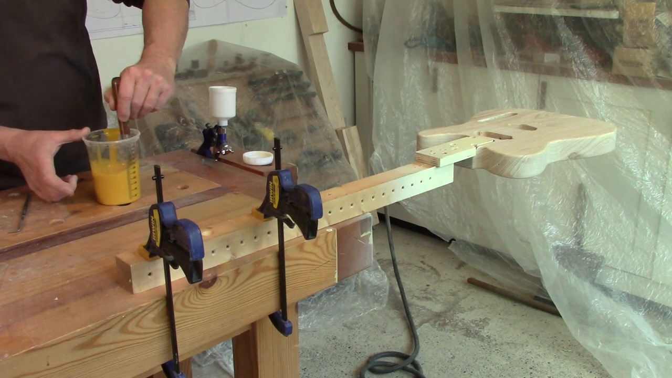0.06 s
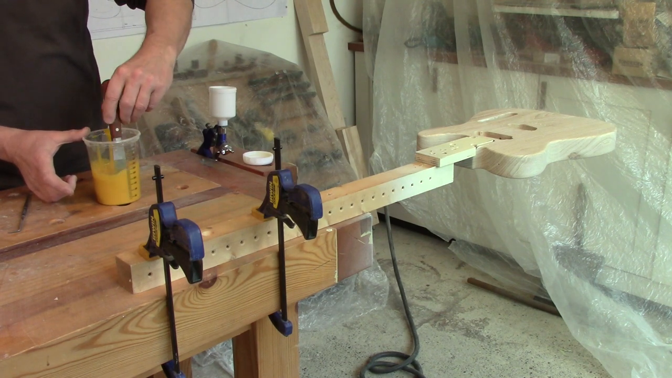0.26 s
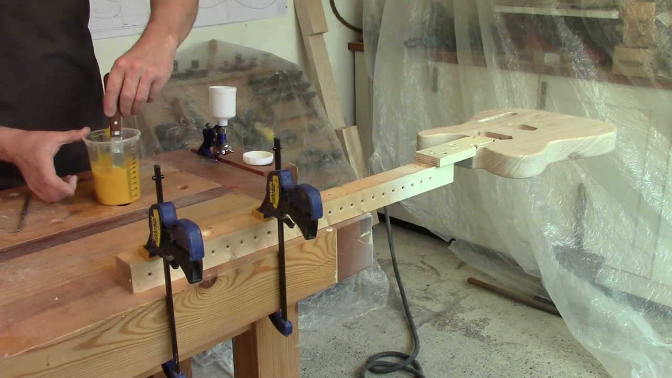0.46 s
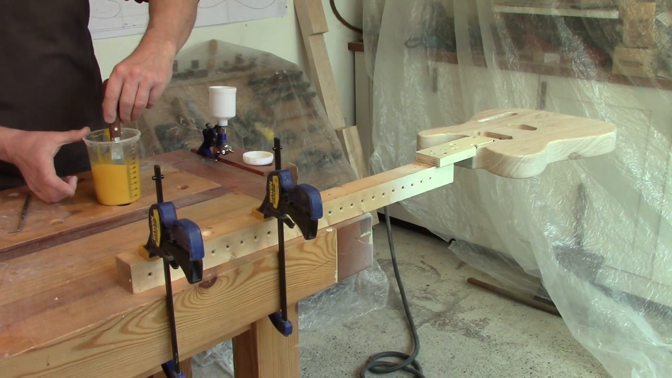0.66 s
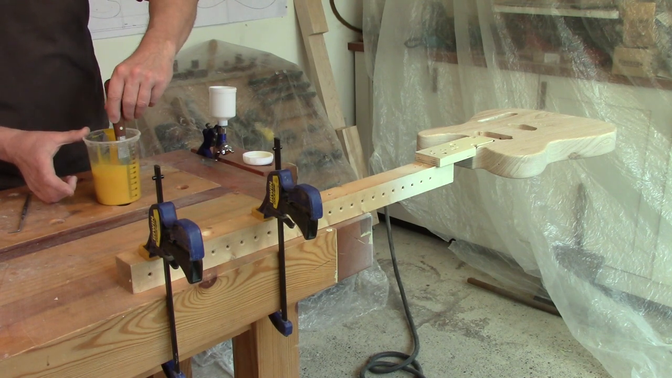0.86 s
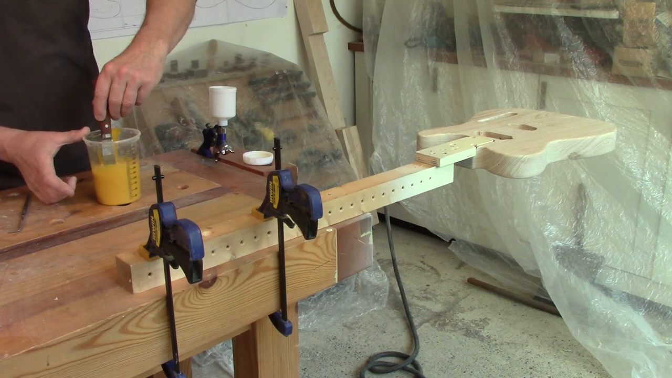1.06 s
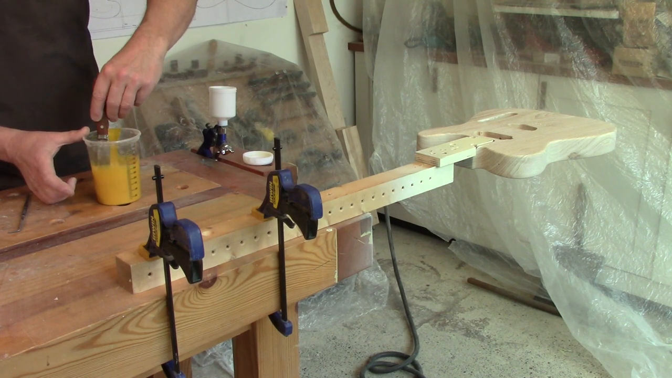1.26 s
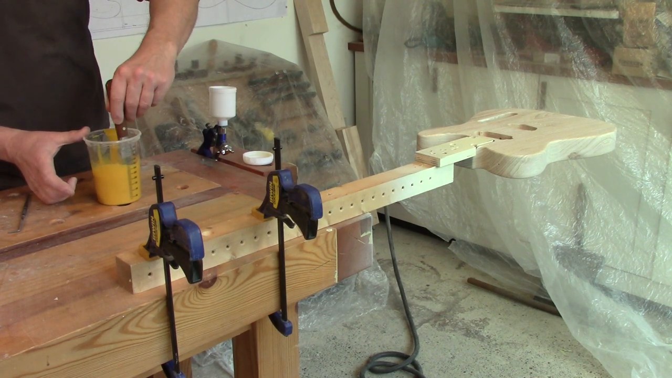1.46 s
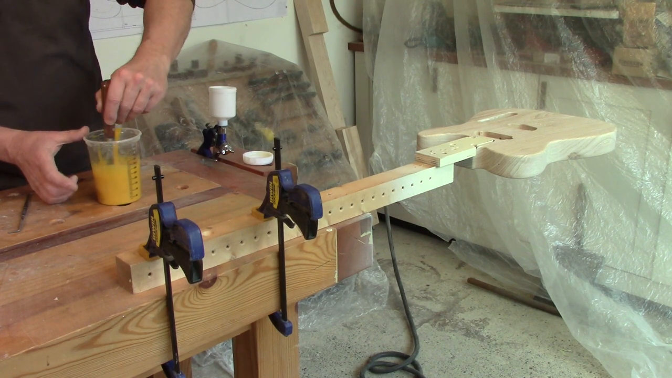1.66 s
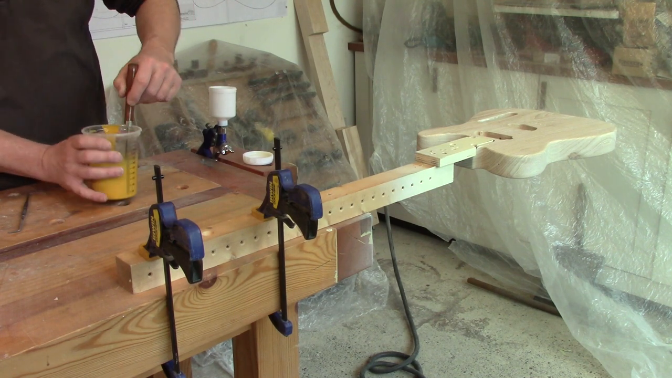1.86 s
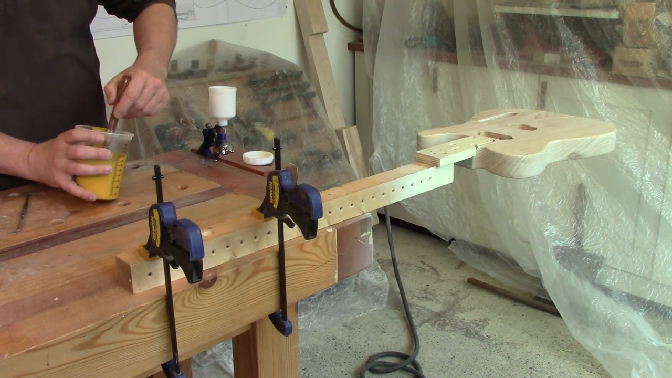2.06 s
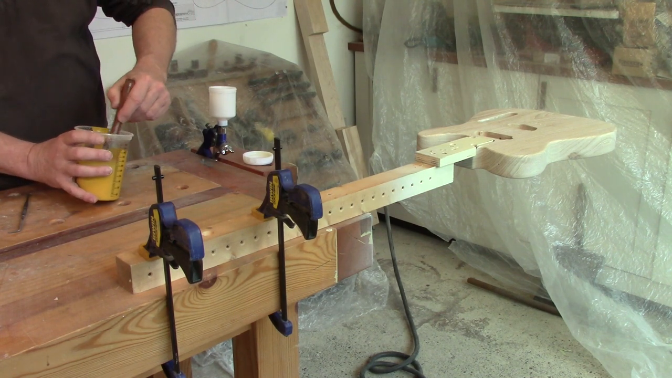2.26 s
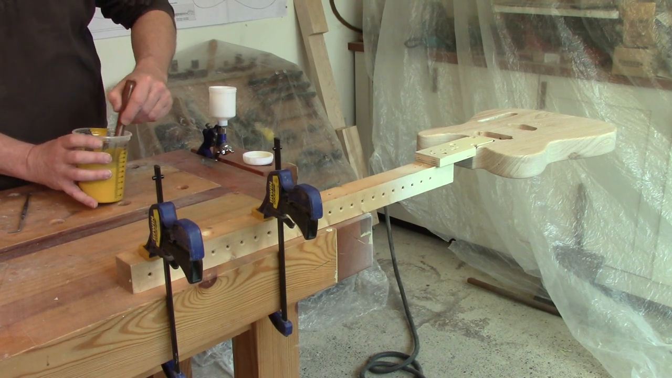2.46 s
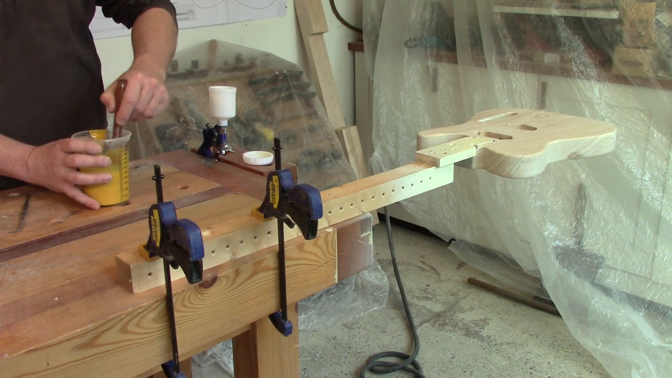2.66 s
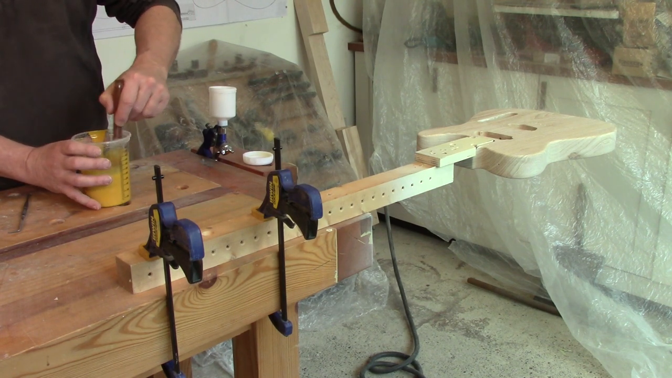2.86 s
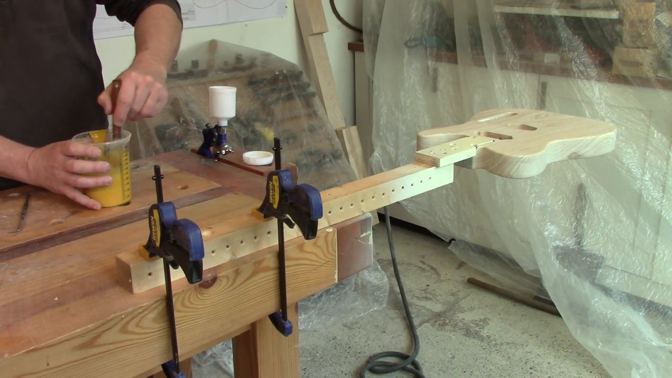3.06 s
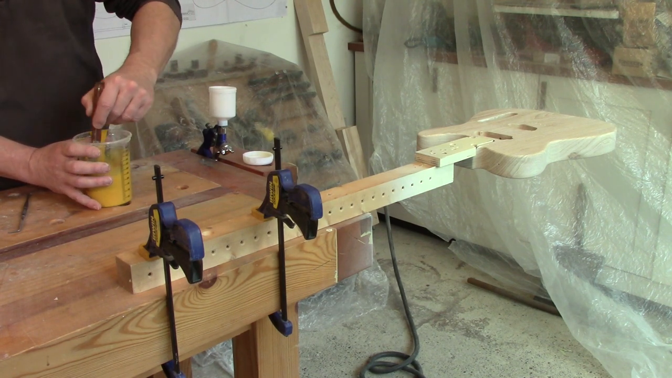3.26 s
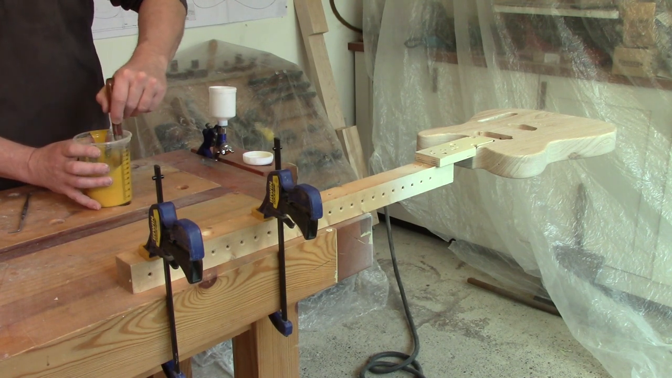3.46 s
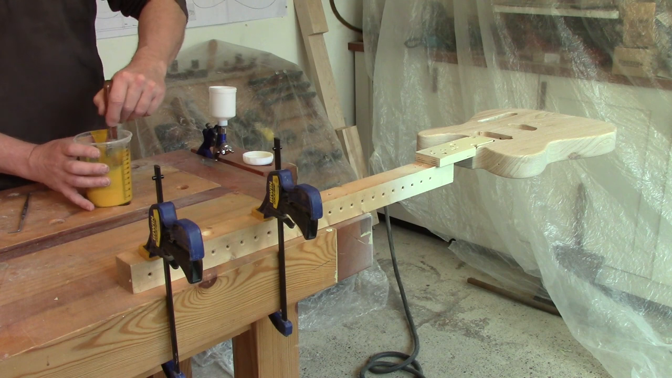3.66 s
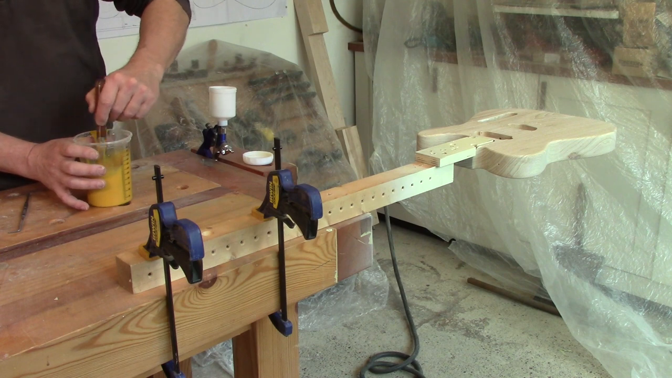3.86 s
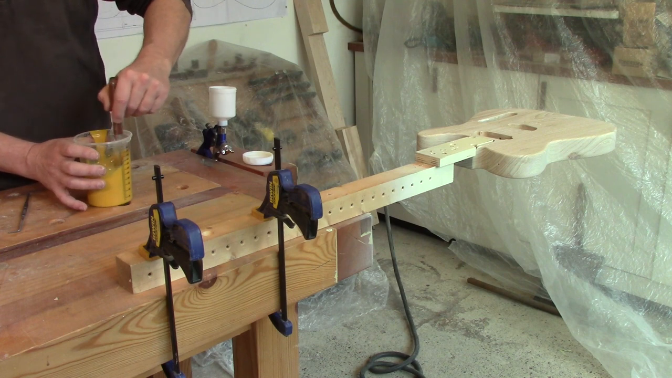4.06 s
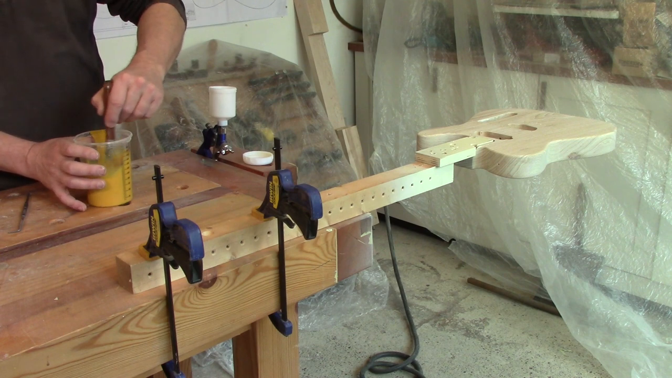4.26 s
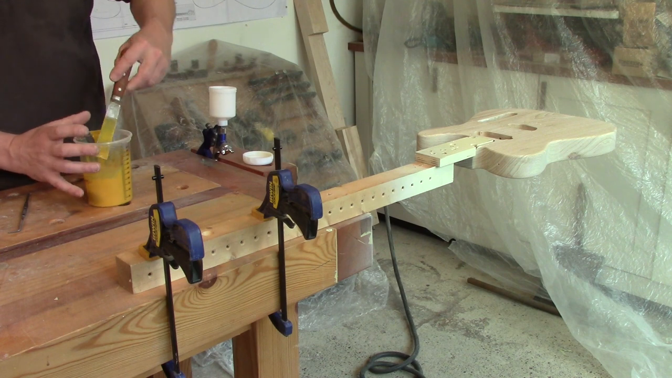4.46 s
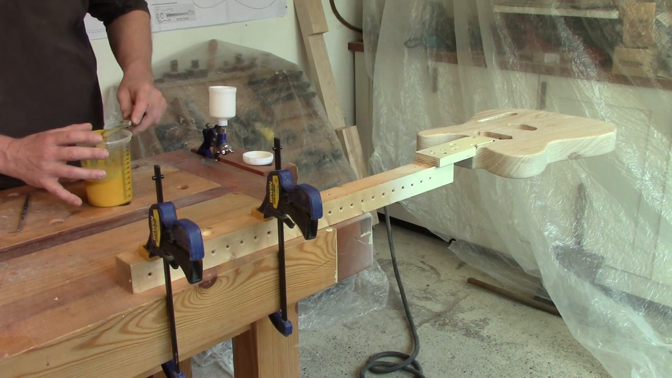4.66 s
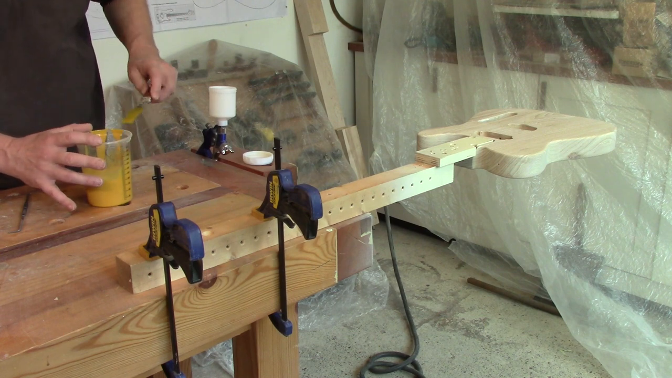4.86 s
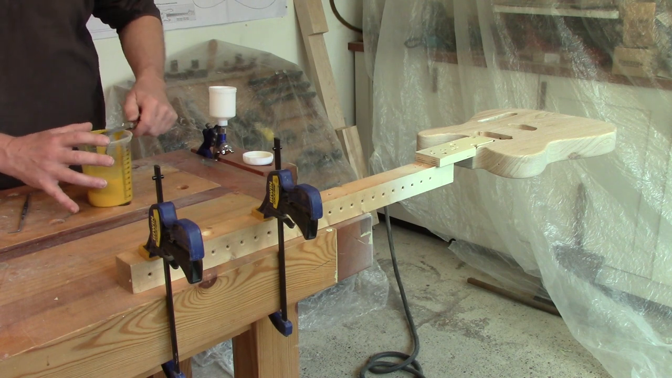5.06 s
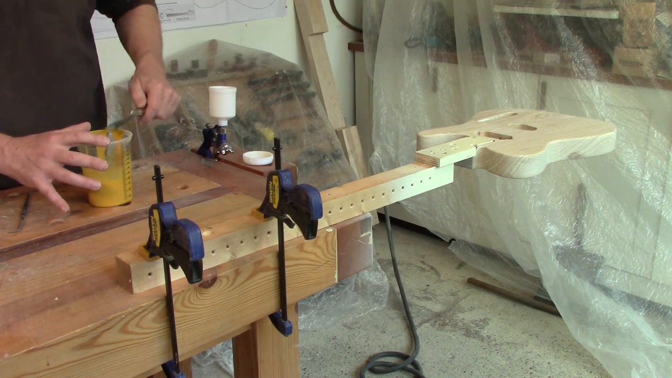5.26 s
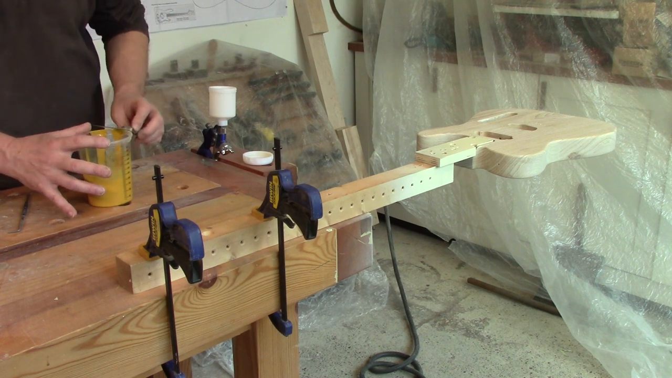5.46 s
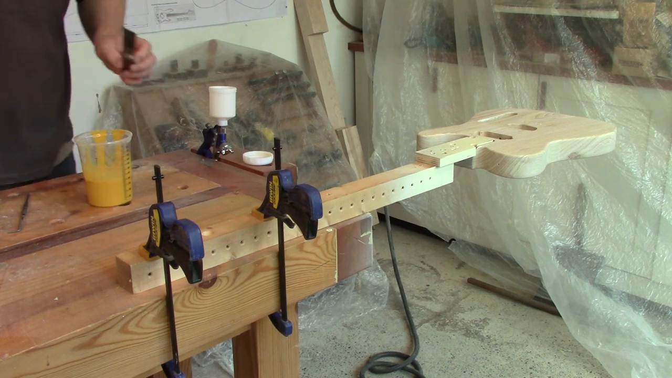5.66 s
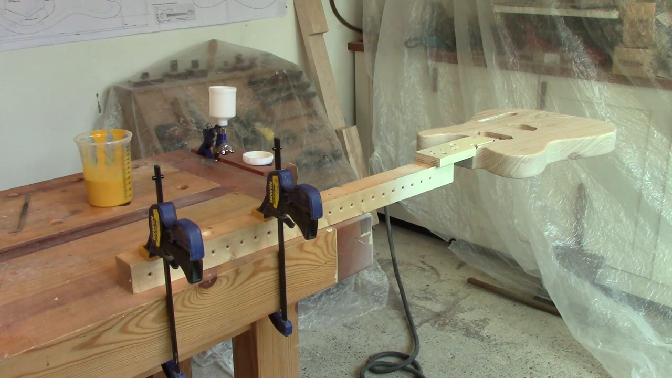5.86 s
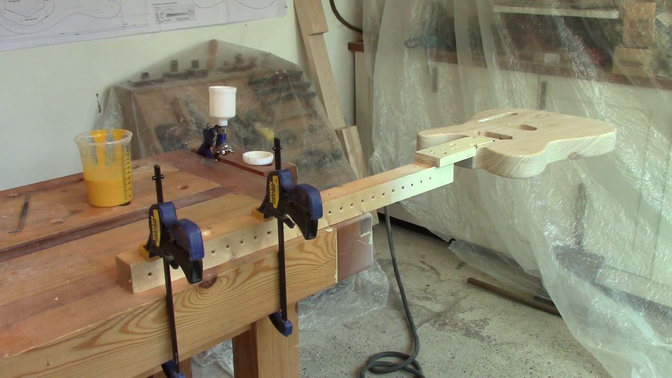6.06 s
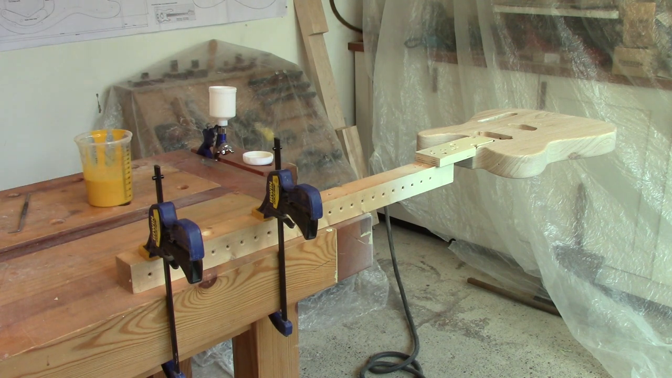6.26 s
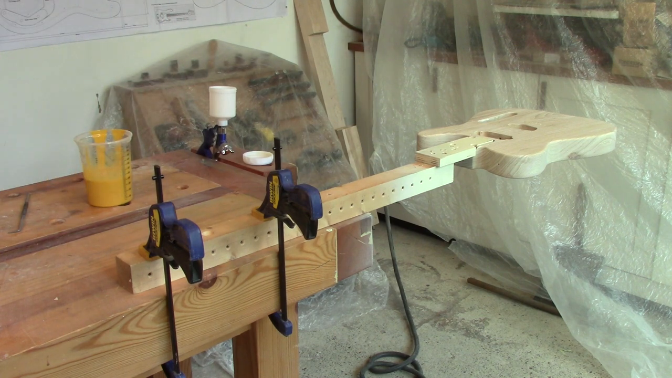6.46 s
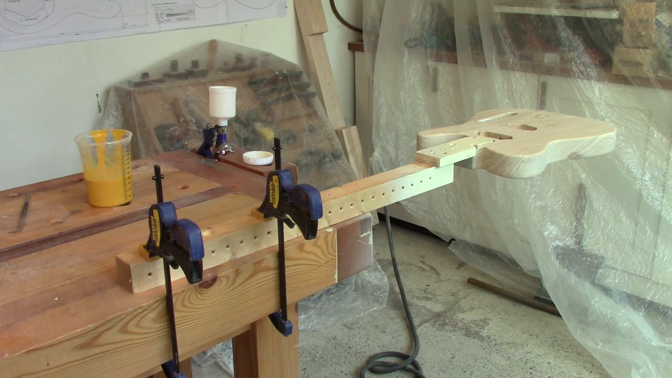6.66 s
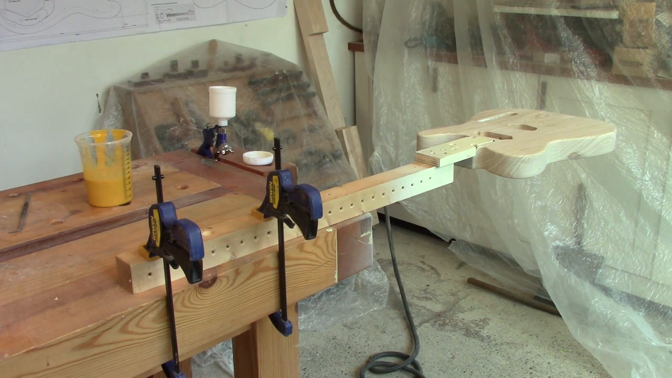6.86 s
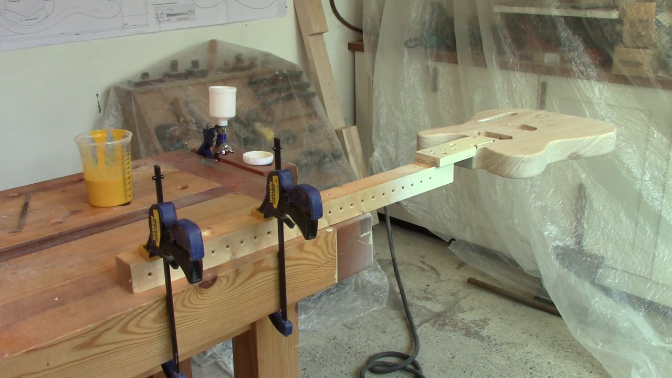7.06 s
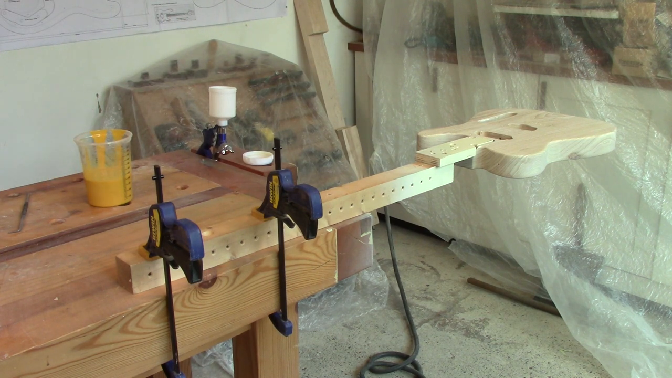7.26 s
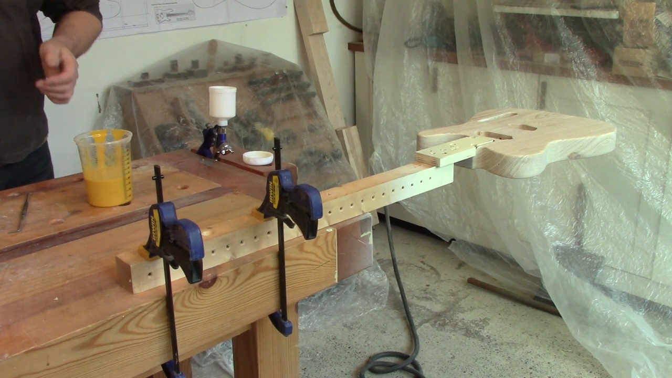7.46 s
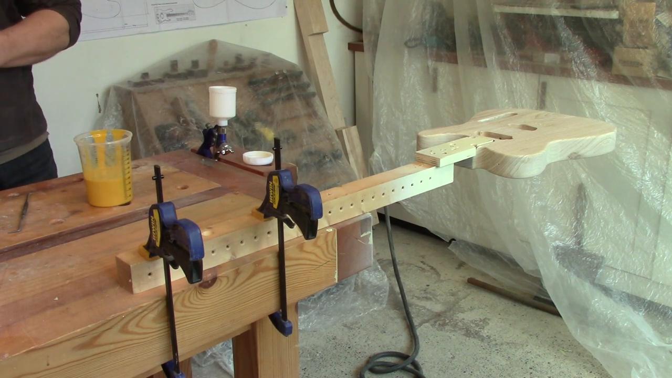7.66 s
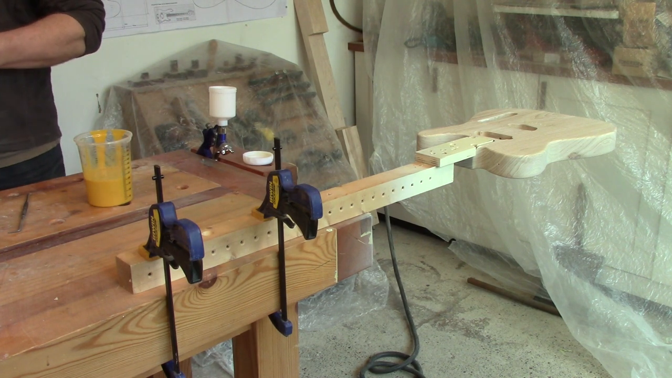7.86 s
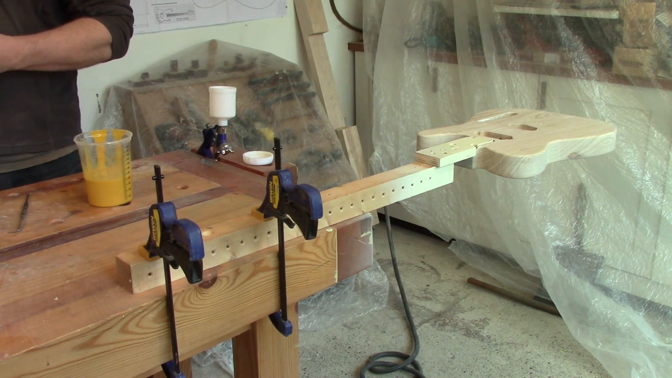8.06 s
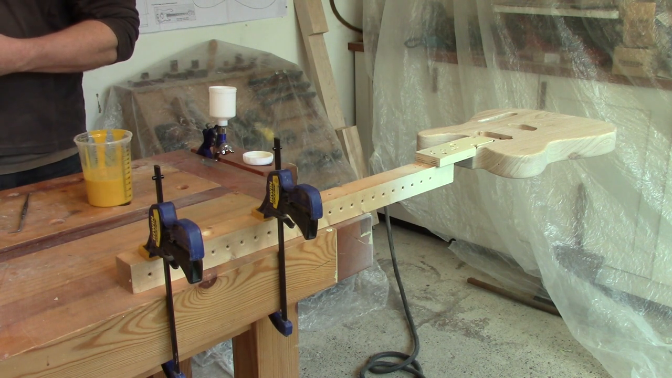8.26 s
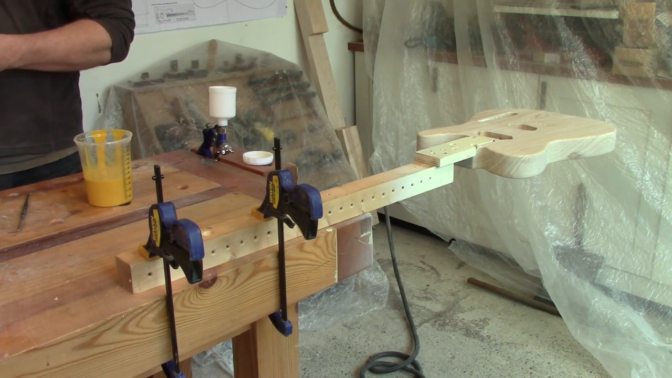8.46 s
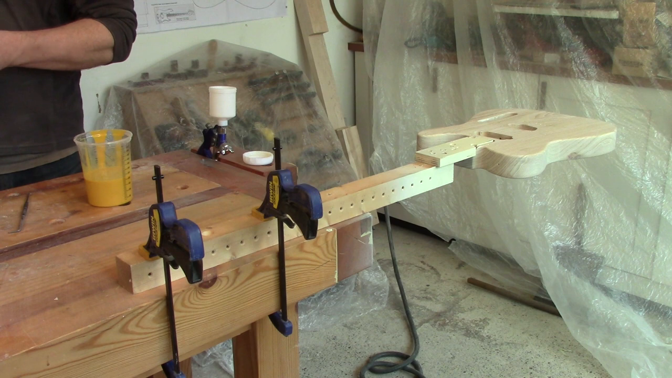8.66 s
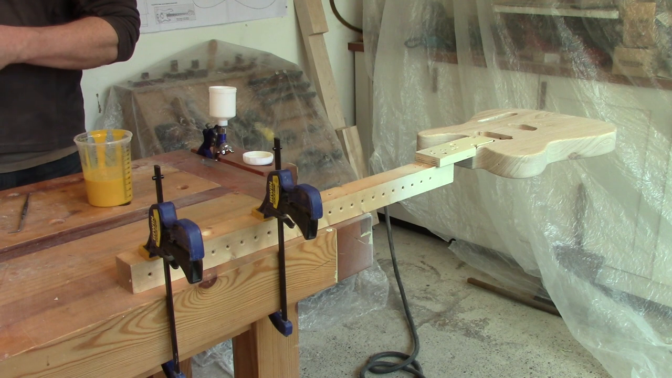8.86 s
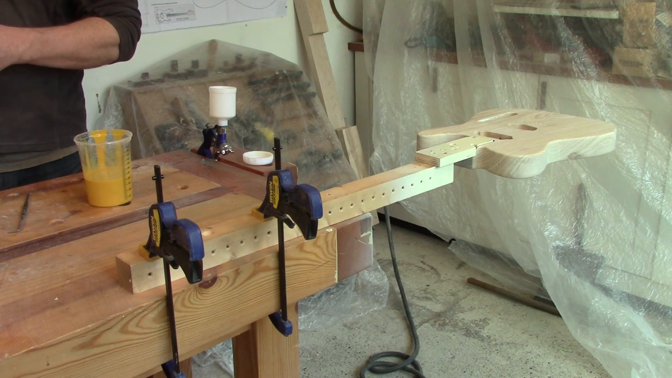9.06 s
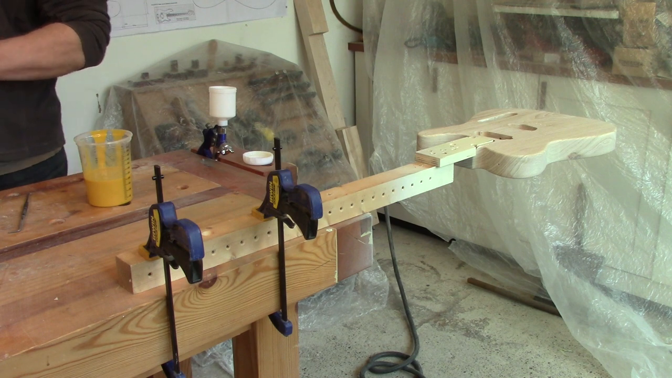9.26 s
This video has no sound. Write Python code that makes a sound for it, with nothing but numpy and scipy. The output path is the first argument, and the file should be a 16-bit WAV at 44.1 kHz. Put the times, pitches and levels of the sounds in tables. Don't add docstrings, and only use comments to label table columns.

```python
import sys
import numpy as np
from scipy import signal
from scipy.fft import rfft, irfft, next_fast_len
from scipy.io import wavfile
from scipy.ndimage import uniform_filter1d, map_coordinates

SR = 44100
rng = np.random.default_rng(int(sys.argv[2]) if len(sys.argv) > 2 else 0)


def gain_from_decibels(decibels):
    exponent = np.asarray(decibels, float) / 20
    return 10 ** exponent


def master(y):
    cut = np.clip(np.atleast_2d(y).T, -1, 1)
    pcm = np.round(cut * 32767)
    wavfile.write(sys.argv[1], SR, pcm.astype(np.int16))


N = 410571

# [t/s, ring level/dB, crack over ring/dB, struck spot f/Hz, stick over cup/dB]
STIR_KNOCKS = [(.039, -36, 7.5, 2570, -5), (.092, -31, -10, 2520, -5), (.102, -22.5, -16, 2300, -1),
               (.133, -13.5, -18, 1730, -1), (.244, -29.5, -1, 2500, -2), (.28, -20.5, -7.5, 2340, -5.5),
               (.329, -30, -1, 2360, 0), (.385, -38, 1.5, 2700, 4), (.402, -40, -5, 900, 1),
               (.429, -36, 1, 4090, 5), (.458, -28, -6, 2750, 13), (.521, -30.5, -2, 2860, 12),
               (.558, -27.5, -22, 1090, 1), (.687, -39, 4.5, 1140, 7), (.716, -29, -24, 2370, -4),
               (.733, -28, -1.5, 2510, 14), (.776, -22.5, -12, 2300, 10), (.861, -34.5, -3, 2940, 5),
               (.886, -29, -15, 2360, 5), (.937, -29.5, -7.5, 1310, 6), (1.038, -32.5, -6.5, 2670, 4),
               (1.066, -34.5, -7, 2470, -2), (1.118, -19.5, -15, 1730, -1.5), (1.156, -28.5, -13, 1900, 7),
               (1.173, -21.5, -35, 3030, 19), (1.226, -31, -2.5, 2450, 4), (1.259, -23.5, -12, 3050, -0.5),
               (1.308, -22.5, -9.5, 990, 8), (1.355, -20.5, -20, 2410, 1), (1.414, -30, -6, 1500, 11),
               (1.504, -18.5, -6.5, 2480, -1.5), (1.627, -41, 0, 4090, 4), (1.647, -16.5, -5.5, 1710, 2.5),
               (1.699, -25.5, -9, 1310, -4)]
BEATS = [
    (2.081, -19, -9, 3030, 4.5),
    (2.171, -21.5, -2.5, 1340, 2.5),
    (2.262, -18.5, -11.5, 1340, 4),
    (2.348, -18.5, 0, 2510, -1.5),
    (2.442, -20.5, 0, 1220, -4.5),
    (2.539, -17, 1.5, 1360, -2.5),
    (2.636, -13.5, -2.5, 1310, 1),
    (2.737, -13, -7, 1290, 0.5),
    (2.837, -13.5, -7.5, 1920, 2.5),
    (2.935, -14, -3.5, 2420, -6),
]
ROUNDS = [(1.95, -29, -1, 2900, 1), (1.968, -24.5, -5, 1270, 6), (1.994, -38, 16.5, 2300, 14),
          (2.725, -38, -20, 2600, 17), (2.794, -29, -11, 705, 5.5), (2.89, -30.5, -6, 2510, -1),
          (2.941, -13.5, -10, 4800, -5), (3.045, -31.5, 10.5, 1260, -5), (3.086, -34, 8.5, 3030, -7),
          (3.147, -24.5, 4, 1400, -2), (3.181, -22, -31, 990, 3), (3.259, -20, -6, 1300, -0.5),
          (3.295, -12.5, -17, 1000, 5), (3.375, -26.5, -6, 1310, 4), (3.436, -20.5, -37, 1500, -4),
          (3.461, -24, -20, 705, 7), (3.498, -18.5, -36, 2260, -2.5), (3.506, -17.5, -25, 2430, 5),
          (3.549, -13, -23, 1440, 4), (3.553, -25, -17, 4400, 11), (3.611, -16, -10.5, 3100, 4.5),
          (3.621, -28, -15, 2830, 0), (3.383, -21.5, -11, 3030, 4), (3.729, -17.5, -5, 2440, 0),
          (3.823, -30.5, 1, 942, -4), (3.846, -27.5, -15, 2420, 3), (3.868, -22, -20, 2500, 4.5),
          (3.901, -17.5, -40, 1590, -12), (3.939, -23, -3, 1030, 0), (3.968, -20.5, -7, 2510, 14),
          (3.982, -21, -14, 2510, 14), (4.003, -23.5, 1.5, 2510, 3.5), (4.047, -22.5, -5, 2300, -2.5),
          (4.087, -17.5, -7, 3030, 5),
          (4.163, -23, -11, 3030, 0), (4.167, -22, -9, 930, -1), (4.208, -29, -12, 3030, 2),
              (4.212, -23.5, -8, 3030, -4.5), (4.225, -28, -18, 2500, 8), (4.233, -33, -20, 2500, 8),
              (4.253, -36, -20, 2550, 10), (4.263, -13, -20, 1770, -8), (4.273, -20, -25, 1500, -16),
              (4.282, -22, -25, 1090, -7), (4.337, -15.5, -17.5, 1810, -3.5), (4.341, -19.5, -25, 1730, 3)]
RIM_KNOCKS = [(4.597, -18.5, -13, 2350, -4), (4.629, -26, -16, 705, 8.5), (4.739, -28, -23, 2300, 9),
              (4.765, -30, -20, 705, -6), (4.778, -26, -20, 1090, -3), (5.07, -13, -9.5, 2300, 6),
              (5.076, -19.5, -12, 2370, -4), (5.172, -29, 7, 2370, 13), (5.316, -12.5, 3, 2320, 0),
              (5.319, -21, 1, 970, 2), (5.497, -14, -4.5, 2300, -2)]
# [t/s, ring level/dB, crack over ring/dB, spot f/Hz, high over low/dB]
HANDLING = [(5.779, -30.5, -19, 2040, -8), (5.958, -31.5, -5, 1060, 5.5), (6.594, -38, 1, 1170, 6),
            (6.879, -38, 0, 2580, 0), (7.346, -37, -15, 2750, 0), (7.538, -36.5, 6, 3640, -3),
            (7.74, -39, 5, 1320, 6), (7.923, -29, -1.5, 1430, -3), (8.096, -44.5, 12.5, 3900, -6),
            (8.326, -36, 1, 1750, -3), (8.498, -43, 8.5, 2620, 1), (8.649, -41, 2, 1700, 2),
            (8.698, -46, 14, 3790, -5), (9.004, -34, 0, 2700, 5), (9.065, -58, 26, 4400, 0),
            (9.108, -37.5, 6, 1250, 4)]
# [t/s, peak level/dB, f/Hz, chatter t60/s]
CLINKS = [(.134, -15, 993, 0.032), (.43, -44, 4090, .07), (.459, -29, 3230, 0.054), (1.627, -40, 4090, .07),
          (3.55, -28.5, 4400, 0.043), (5.779, -40, 3400, .07), (7.538, -39, 5100, 0.19),
          (7.925, -31, 4860, 0.066), (8.097, -30, 5000, 0.041), (9.005, -35, 2550, 0.034),
          (9.109, -38.5, 4400, 0.056), (9.147, -43, 2400, 0.045), (9.212, -29, 3970, 0.21),
          (9.219, -31.5, 2330, 0.06), (9.245, -32, 6300, .1), (7.42, -43, 1200, .2)]
# [t/s, peak level/dB]
FLICKS = [
    (4.8745, -28),
    (5.2224, -28),
    (5.3473, -17),
    (5.5835, -8.5),
]
# [t/s, peak level/dB]
THUDS = [
    (7.087, -34.5),
    (7.343, -31),
    (7.389, -34),
    (7.55, -34),
    (8.097, -34.5),
    (9.257, -33.5),
]
# [t/s, peak level/dB, brightest f/Hz]
SKIDS = [(0.315, -31, 7600), (0.078, -34, 12500), (0.5695, -36, 8800), (0.585, -32, 11900),
         (0.622, -38, 8000), (0.901, -37, 12000), (0.945, -36, 13000), (1.3324, -29, 12900),
         (1.4037, -40, 10600), (1.4845, -44, 10600), (3.5425, -22.5, 6580), (0.76, -34, 8800),
         (1.0894, -30.5, 13900), (1.128, -36, 6970), (1.155, -35, 6570), (1.255, -28, 5430),
         (1.72, -33, 11500), (1.346, -20.5, 9300), (1.442, -28.5, 8950), (1.594, -36, 9000),
         (3.1958, -23, 6900), (3.3184, -21, 6440), (3.3972, -19, 7540), (3.4585, -31, 11700),
         (3.521, -31, 12200), (3.6427, -21, 6600), (3.762, -21.5, 7600), (3.883, -21, 6740),
         (3.983, -21.5, 8750), (4.018, -23, 11100), (4.119, -22, 6840), (4.2495, -23, 6060)]
# [t/s, peak level/dB, brightest f/Hz]
BACKSWINGS = [(2.148, -44, 7000), (2.2174, -28.5, 7260), (2.3006, -29.5, 12200), (2.3291, -36, 8660),
              (2.4216, -31, 8630), (2.476, -32, 10500), (2.58, -32, 8000), (2.6908, -30, 7910),
              (2.7871, -29, 8320), (2.8888, -28, 6900), (2.988, -25.5, 6640)]
# [t/s, peak level/dB, brightest f/Hz]
SCUFFS = [(7.36, -35, 12000), (7.379, -32, 13500), (7.885, -26.5, 8600), (8.2211, -37, 8100),
          (8.3846, -34, 4650), (8.562, -36, 10500), (8.894, -35, 6800), (8.9564, -45, 6000),
          (9.1846, -33, 5670)]

# [t/s, level/dB]
STIR = [(0, -55), (.21, -67), (.33, -77), (.66, -71), (.8, -73), (1.02, -71), (1.3, -68), (1.55, -55.5),
        (1.78, -69), (2.07, -63.5), (2.8, -54), (3.2, -55), (3.45, -50), (3.72, -53), (4.0, -52),
        (4.3, -50), (4.42, -77)]
# [full at t/s, rise/s, hold/s, pressure level/dB]
WIPE = [(4.628, .03, 0.02, -48.5), (4.745, .008, 0.052, -47), (4.791, 0.12, 0.029, -34.5),
        (4.836, 0.071, 0.044, -40.5), (5.11, 0.02, 0.063, -43.5), (5.171, 0.022, 0.054, -38),
        (5.229, .04, 0.00081, -42.5), (5.345, 0.03, 0.0061, -32), (5.517, 0.021, 0.017, -38.5),
        (5.587, 0.16, 0.00015, -32)]
# [t/s, effort level/dB]
RAG = [(5.77, -67), (5.84, -51.5), (6.1, -49), (6.3, -57), (6.55, -57.5), (6.86, -54), (6.94, -63.5),
       (7.33, -63.5), (7.5, -69), (7.56, -50.5), (8.06, -54), (8.2, -58.5), (8.65, -59), (8.72, -53),
       (8.86, -56), (8.98, -58), (9.15, -51), (9.31, -47)]
# [t/s, half length/s, body level/dB, hiss level/dB]
STROKES = [(1.834, 0.011, -54, -41.5), (5.861, 0.019, -43.5, -46), (5.975, 0.0079, -48, -48),
           (6.011, 0.023, -44.5, -50), (6.232, 0.025, -47.5, -43.5), (6.347, 0.015, -59, -37),
           (6.437, 0.016, -60, -40.5), (6.62, 0.013, -58, -47), (6.699, 0.018, -48.5, -39),
           (6.794, 0.011, -72, -49), (7.406, 0.018, -55, -39), (7.559, 0.016, -48, -69),
           (7.704, 0.018, -73, -45.5), (7.908, 0.011, -46, -58), (8.108, 0.013, -48, -52),
           (8.338, 0.0082, -47, -54), (8.733, 0.066, -68, -59), (9.236, 0.022, -43, -31.5)]
# [t/s, level/dB]
HUM_SWELL = [(0.0, -80), (1.09, -87), (1.19, -71), (2.41, -90), (2.95, -68), (3.08, -92), (4.25, -79.5),
             (5.37, -77), (6.43, -84), (7.08, -73.5), (7.16, -94), (9.31, -78)]

# [f/Hz, level/dB, t60/s]
CUP = [(510, -2, 0.12), (705, -1.5, 0.19), (912, 8.5, 0.023), (1090, 7.5, 0.0062), (1310, 13, 0.0098),
       (1500, -13, 0.0054), (1690, -12, 0.036), (1730, 7, 0.016)]
# [f/Hz, level/dB, t60/s]
STICK = [(1890, 5.5, 0.022), (2170, -4, 0.0025), (2370, 9.5, 0.013), (2510, 5, 0.042), (2723, 9.5, 0.007),
         (3030, 12, 0.0074), (3400, 9.5, 0.047), (3640, -1, 0.0055), (4090, -7, 0.1), (4400, -42, 0.016),
         (4800, -17, 0.017), (5320, -7, 0.052)]
# [f/Hz, width/Hz, level/dB]
EDGE = [(2370, 180, 5.5), (3300, 1300, -8), (4400, 330, -4), (1090, 1700, -11)]
# [f/Hz, width/Hz, level/dB]
BENCH = [(480, 110, 5.5), (770, 190, 5), (1280, 600, 2.5)]
# [f/Hz, width/Hz, level/dB]
STANDING = [(705, 45, -1), (1090, 40, -2), (1292, 50, -4), (1462, 40, -6), (1595, 40, -4), (1760, 40, -7),
            (2230, 50, -7.5), (2365, 50, -3), (2510, 50, -3), (3014, 90, -8)]

# [f/Hz, level/dB per Hz]
CRACK = [(2350, -33), (4000, 0.5), (4810, -6), (7680, 2), (11200, -3), (12700, -2), (16000, -10),
         (16500, -48)]
# [f/Hz, level/dB per Hz]
WET = [(2350, -52), (4000, -9), (5070, -4), (9170, 0.5), (13600, -1.5), (15900, -7), (16500, -98)]
# [f/Hz, level/dB per Hz]
RIM_HISS = [(2650, -7.5), (4500, -11), (4940, -8), (6340, -12), (7620, -3.5), (9020, -11.5), (11300, -16.5),
            (15000, -12), (16200, -22), (16500, -53)]
# [f/Hz, level/dB per Hz]
RAG_BODY = [(250, -44), (700, 6), (1800, 2.5), (3300, 2), (4900, 3.5), (7500, -6.5), (14000, -39)]
# [f/Hz, level/dB per Hz]
RAG_HISS = [(2060, -56), (3500, -8), (4660, -2), (9630, 4), (15100, -1.5), (16200, -7), (16500, -40)]
# [f/Hz, level/dB per Hz]
AIR = [(25, -14), (86, -13.5), (184, -3.5), (237, -4), (313, -2), (448, 1), (538, 4), (809, 2.5),
       (1250, 6.5), (1400, 1.5), (2040, 0), (3910, -3.5), (13600, -12.5), (15500, -8), (16500, -63)]
# [f/Hz, likeness]
ALIKE = [(70, 0.1), (130, 0.77), (600, 0.73), (15000, 0.73)]
# [f/Hz, t60/s]
SHOP = [(300, 0.31), (1000, 0.15), (3000, 0.16), (12000, 0.038)]
# [f/Hz, side minus mid level/dB]
WIDTH = [(300, -41), (700, -51), (1300, -56), (2400, -27), (4400, -26.5), (15000, -17)]

SHELL_HZ, SHELL_WIDE_HZ = 3050, 730
DIP_HZ, DIP_WIDE_HZ = 3400, 577
RISE_DB, RELEASE_DB_PER_S = 51, 483
CLINK_CYCLES = 23
SQUEAK_S, SQUEAK_LENGTH_S, SQUEAK_DB = 8.4, 0.091, -54
SQUEAK_HZ, SQUEAK_SAG_HZ_PER_S = 4770, 6500
AIR_DB, HUM_HZ = -56, 195
MIC_HZ = 411
EDGE_HZ = 15950


def unit(x):
    return x / np.sqrt(np.mean(x ** 2) + 1e-20)


def peak(x):
    return x / np.abs(x).max(axis=-1, keepdims=True)


def decay(t, t60):
    return gain_from_decibels(-60 * t / t60)


def noise(count, t):
    return rng.standard_normal((count, len(t)))


def wobble(rate):
    return map_coordinates(rng.standard_normal(int(N * rate / SR) + 4), [np.arange(N) * rate / SR])


def along(points, hz):
    f, v = np.transpose(points)
    return np.interp(np.log(hz + 1), np.log(f + 1), v)


def colour(spectrum):
    return lambda hz: gain_from_decibels(along(spectrum, hz))


def filtered(x, response):
    m = next_fast_len(x.shape[-1] + 2048, real=True)
    return irfft(rfft(x, m) * response(np.fft.rfftfreq(m, 1 / SR)), m)[..., :x.shape[-1]]


def resonances(peaks):
    def response(f):
        total = 0
        for k, (c, w, db) in enumerate(peaks):
            total = total + (-1) ** k * gain_from_decibels(db) * 1j * f * w / (c * c - f * f + 1j * f * w)
        return total
    return response


def knocks(events, wet_db, lean_db, even_hz, skid, rattle, grip_db):
    s, db, crack, spot_hz, bias_db = np.transpose(events)[:, :, None]
    held = [(hz, level - grip_db * (hz < 900), t60) for hz, level, t60 in CUP]
    stick_db = lean_db * np.clip(np.log2(spot_hz / even_hz), -1, 1) + bias_db
    t = np.arange(SR // 14) / SR
    bright_hz = rng.uniform(7000, 19500, (len(s), 1))

    def tint(hz):
        return colour(CRACK)(hz) * (1 + 0.5 * np.exp(-((hz - bright_hz) / 1800) ** 2))

    snap = filtered(noise(len(s), t), tint) * (decay(t, 0.0084) + 0.56 * decay(t, skid))
    cup = ring(held, spot_hz, t, detune=0.0032, chatter=0.039, rattle=rattle)
    stick = ring(STICK, spot_hz, t, detune=0.019, chatter=0.012, rattle=0.71 * rattle)
    hits = gain_from_decibels(np.minimum(-stick_db, 0)) * cup + gain_from_decibels(np.minimum(stick_db, 0)) * stick
    hits = filtered(hits, shell) + gain_from_decibels(crack) * peak(snap)
    return place(s[:, 0], gain_from_decibels(db - 4.0) * hits, wet_db)


def ring(modes, favoured_hz, t, detune, chatter, rattle):
    hz, db, t60 = np.transpose(modes)[:, :, None]
    luck = rng.standard_normal((2, len(favoured_hz), len(hz), 1))
    octave_like = np.log(hz / favoured_hz[:, None]) / .16
    spot_db = 10 * np.exp(-octave_like ** 2) + 1.5 * luck[0]
    clack = 4.2 * decay(t, 0.0064)
    tones = gain_from_decibels(db) * np.sin(2 * np.pi * hz * (1 + detune * luck[1]) * t)
    tones *= 1 - np.exp(-t / 0.00024)
    blow = (gain_from_decibels(spot_db) * (decay(t, t60) + clack) * tones).sum(axis=1)
    touch = (gain_from_decibels(0.58 * spot_db + 3.0) * (decay(t, 0.45 * t60) + clack) * tones).sum(axis=1)
    force = rattle * noise(len(favoured_hz), t) * decay(t, chatter)
    return peak(blow + signal.fftconvolve(touch, alike(force), axes=1)[:, :len(t)])


def shell(f):
    dip = DIP_HZ ** 2 - f * f + 1j * f * DIP_WIDE_HZ
    return dip / (SHELL_HZ ** 2 - f * f + 1j * f * SHELL_WIDE_HZ)


def stirring():
    drag, hiss = gains(STIR, grows=0.85, middle_db=-61.5)
    wall = resonances([(hz, 8 / t60, db) for hz, db, t60 in CUP + STICK])
    body = drag * friction(wall, 150, 25.0, 3.6, -1.5)
    wet = hiss * friction(colour(WET), 240, 3, 0.47, -1.9)
    return gain_from_decibels(2.0) * (body + wet)


def wiping():
    squeal = pressure()
    hiss = squeal ** 1.238
    scrape = gain_from_decibels(0.5) * squeal * friction(resonances(EDGE), 410, 16.0, 3.2, -1.6)
    return scrape + gain_from_decibels(10.0) * hiss * friction(colour(RIM_HISS), 250, 3.9, 2.3, -1.7)


def pressure():
    t = np.arange(N) / SR
    s, rise, hold, db = np.transpose(WIPE)[:, :, None]
    rising = RISE_DB * np.maximum(s - t, 0) / rise
    falling = RELEASE_DB_PER_S * np.maximum(t - s - hold, 0)
    return gain_from_decibels(np.max(db - rising - falling, axis=0))


def gains(effort, grows, middle_db):
    db = np.interp(np.arange(N) / SR, *np.transpose(effort), -150, -150)
    return gain_from_decibels([db, middle_db + grows * (db - middle_db)])


def friction(response, slips, spread_db, flutter_db, wide_db):
    slip = (rng.random(N) < slips / SR) * gain_from_decibels(np.minimum(spread_db * rng.exponential(size=N), 13))
    rub = rng.standard_normal((2, N)) * [1 + slip, np.ones(N)] * gain_from_decibels(min(flutter_db, 2) * wobble(40))

    def mid_side(hz):
        return response(hz) * [np.ones(len(hz)), gain_from_decibels(along(WIDTH, hz) + wide_db)]

    mid, side = filtered(rub, mid_side)
    return unit(np.array([mid + side, mid - side]))


def patchy(x, depth_db):
    z = signal.stft(x, nperseg=256)[2]
    field = uniform_filter1d(rng.standard_normal(z.shape[1:]), size=9, axis=0)
    field = uniform_filter1d(field, size=7, axis=1)
    return signal.istft(z * gain_from_decibels(depth_db * unit(field)), nperseg=256)[1][:, :N]


def flicks():
    s, db = np.transpose(FLICKS)[:, :, None]
    t = np.arange(SR // 100) / SR
    click = filtered(noise(len(s), t), resonances([(4900, 6200, 0)]))
    return place(s[:, 0], gain_from_decibels(db) * peak(click * decay(t, 0.0038)), -1.0)


def skids():
    s, db, bright_hz = np.transpose(SKIDS + SCUFFS + BACKSWINGS)[:, :, None]
    t = np.arange(SR // 14) / SR

    def tint(hz):
        return colour(WET)(hz) * (1 + 1.7 * np.exp(-((hz - bright_hz) / 1200) ** 2))

    hiss = filtered(noise(len(s), t), tint) * decay(t, 0.09) * np.cos(np.pi * t / t[-1] / 2)
    return place(s[:, 0], gain_from_decibels(db - 8.5) * peak(hiss), -0.54)


def clinks():
    s, db, hz, t60 = np.transpose(CLINKS)[:, :, None]
    t = np.arange(SR // 14) / SR
    chatter = noise(len(s), t) * decay(t, t60)
    mode = decay(t, CLINK_CYCLES / hz) * np.sin(2 * np.pi * hz * t)
    tone = signal.fftconvolve(mode, chatter, axes=1)[:, :len(t)]
    return place(s[:, 0], gain_from_decibels(db) * peak(tone), -2.5)


def rag():
    body, hiss = np.pad(gains(RAG, grows=1.32, middle_db=-48.5), ((0, 0), (0, SR)))
    t = np.arange(-SR // 5, SR // 5) / SR
    for s, half, body_db, hiss_db in STROKES:
        swell = np.exp(-np.where(t < 0, .6, .35) * (t / max(half, .005)) ** 2)
        start = round(s * SR) - SR // 5
        body[start:][:len(t)] += gain_from_decibels(body_db - 0.5) * swell
        hiss[start:][:len(t)] += gain_from_decibels(hiss_db - 4.5) * swell
    rub = body[:N] * friction(colour(RAG_BODY), 170, 8.3, 3.7, 2.8)
    return rub + hiss[:N] * friction(colour(RAG_HISS), 260, 6.4, 3.0, 1.9)


def squeak():
    t = np.arange(N) / SR - SQUEAK_S
    swell = np.sin(np.pi * np.clip(t / SQUEAK_LENGTH_S, 0, 1)) ** .6
    phase = 2 * np.pi * (SQUEAK_HZ * t - SQUEAK_SAG_HZ_PER_S * t * t / 2) + .8 * wobble(150)
    return gain_from_decibels(SQUEAK_DB + 3.0 * wobble(80)) * swell * np.sin(phase)


def thuds():
    s, db = np.transpose(THUDS)[:, :, None]
    t = np.arange(SR // 14) / SR
    puff = noise(len(s), t) * decay(t, 0.072)
    low = filtered(puff, lambda hz: resonances(BENCH)(hz) / (1 + 1j * hz / 1600) ** 2)
    return place(s[:, 0], gain_from_decibels(db) * peak(low), 0.5)


def standing(hz):
    return 1 + sum(resonances([one])(hz) for one in STANDING)


def place(times, sounds, wet_db):
    out = np.zeros((2, N + SR))
    heard = signal.fftconvolve(sounds[:, None], shop(len(times), wet_db), axes=2)
    for s, one in zip(times, heard):
        out[:, round(s * SR):][:, :one.shape[1]] += one
    return out[:, :N]


def shop(count, wet_db):
    hz, t, z = signal.stft(rng.standard_normal((count, 2, SR // 8)), SR, nperseg=256)
    z[:, 1] *= gain_from_decibels(along(WIDTH, hz) + 5.5)[:, None]
    tails = signal.istft(z * decay(t, along(SHOP, hz)[:, None]), SR, nperseg=256)[1]
    tails *= gain_from_decibels(wet_db) / np.linalg.norm(tails[:, :1], axis=2, keepdims=True)
    tails[..., :40] = 0
    tails[:, 0, 0] = 1
    tails = alike(tails)
    return np.stack([tails[:, 0] + tails[:, 1], tails[:, 0] - tails[:, 1]], axis=1)


def alike(x):
    z = rfft(x, 2 * x.shape[-1])
    bins = round(330 * 2 * x.shape[-1] / SR)
    broad = uniform_filter1d(np.abs(z) ** 2, size=bins, axis=-1)
    return irfft(z * np.sqrt(broad.mean(axis=0) / broad))[..., :x.shape[-1]]


def air():
    def mid_side(hz):
        turn = np.arccos(np.clip(along(ALIKE, hz), -1, 1)) / 2
        return colour(AIR)(hz) * [np.cos(turn), np.sin(turn)]

    mid, side = filtered(rng.standard_normal((2, N)), mid_side)
    t = np.arange(N) / SR
    hum_db = np.interp(t, *np.transpose(HUM_SWELL)) + 1.0 + 0.95 * wobble(8)
    hum = gain_from_decibels(hum_db) * np.sin(2 * np.pi * HUM_HZ * t + 1.2 * wobble(5.5))
    return gain_from_decibels(AIR_DB + 0.89 * wobble(2.14)) * unit(np.array([mid + side, mid - side])) + hum


def scene():
    cup = knocks(STIR_KNOCKS, wet_db=0.5, lean_db=11.0, even_hz=1600, skid=0.13, rattle=0.12, grip_db=3.0)
    cup += knocks(BEATS, wet_db=-4.5, lean_db=2.0, even_hz=1810, skid=0.1, rattle=0.22, grip_db=32)
    cup += knocks(ROUNDS, wet_db=-1.94, lean_db=6.5, even_hz=1880, skid=0.094, rattle=0.17,
                  grip_db=-1.5)
    cup += knocks(RIM_KNOCKS, wet_db=-4.0, lean_db=5.5, even_hz=1200, skid=0.11, rattle=0.09, grip_db=4.0)
    cup += patchy(stirring() + wiping(), depth_db=2.0)
    handled = knocks(HANDLING, wet_db=4.0, lean_db=11.0, even_hz=2300, skid=0.061, rattle=0.11, grip_db=-10.0)
    aside = gain_from_decibels(2.5) * handled + thuds() + patchy(rag(), depth_db=2.9)
    near = filtered(cup, standing) + aside + skids() + flicks() + clinks() + squeak()
    near = filtered(near, lambda hz: (1j * hz / (MIC_HZ + 1j * hz)) ** 6)
    return near * gain_from_decibels([[.15], [-.15]]) + air()


def roll_off(x):
    return signal.sosfilt(signal.butter(12, 17020, fs=SR, output="sos"), x)


def record(dry):
    mix = filtered(dry, lambda hz: np.where(hz < EDGE_HZ, 1, gain_from_decibels(-18)) * (hz < 16980))
    return roll_off(mix)


dry = scene()
out = record(dry)
master(out)
```